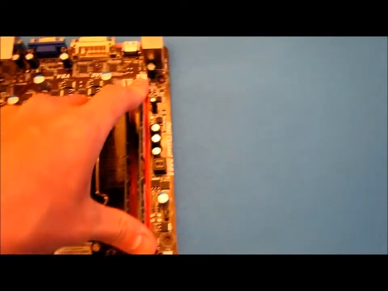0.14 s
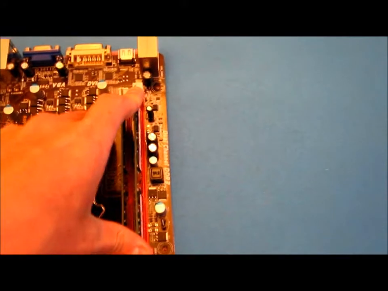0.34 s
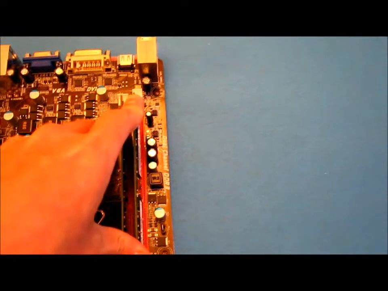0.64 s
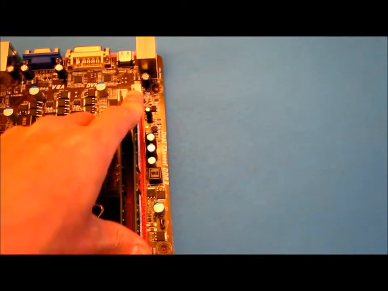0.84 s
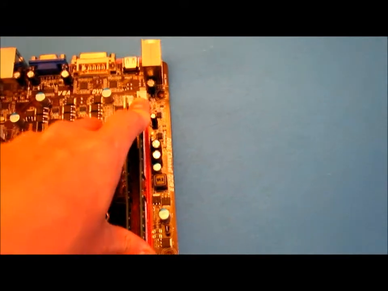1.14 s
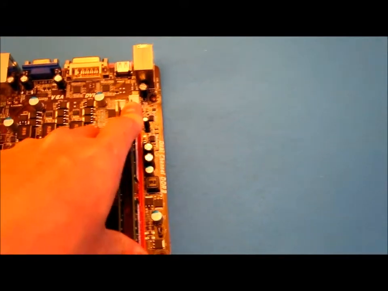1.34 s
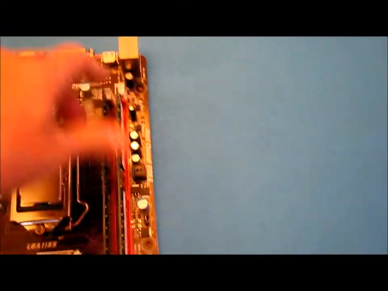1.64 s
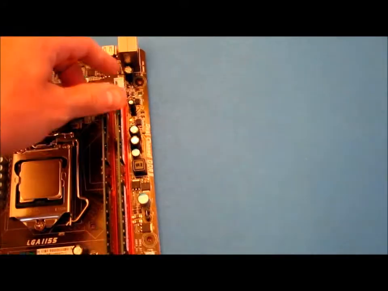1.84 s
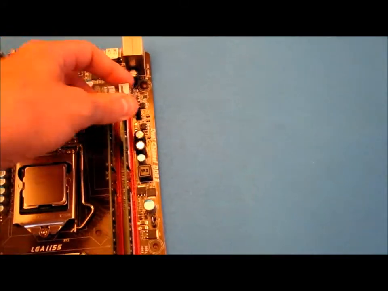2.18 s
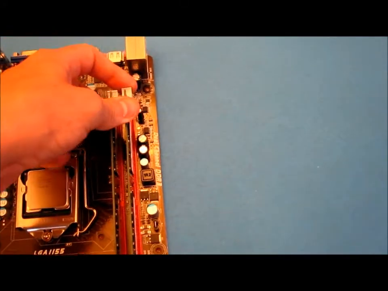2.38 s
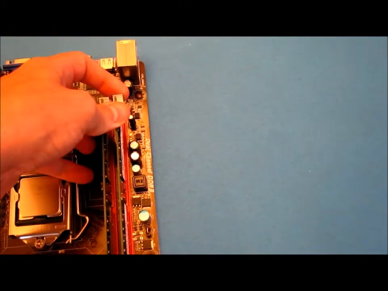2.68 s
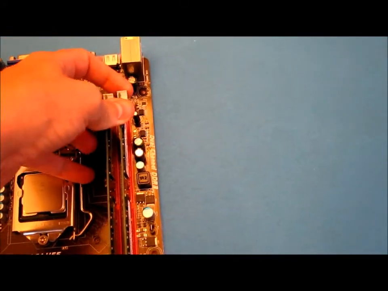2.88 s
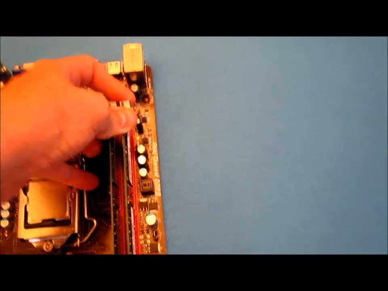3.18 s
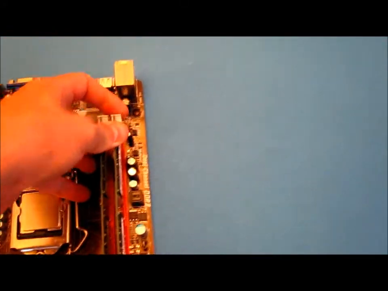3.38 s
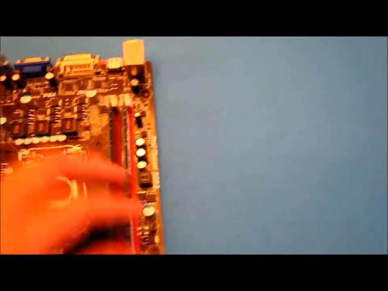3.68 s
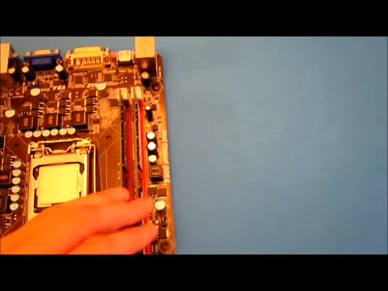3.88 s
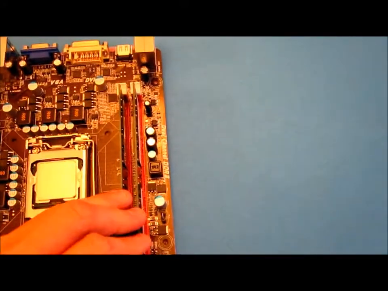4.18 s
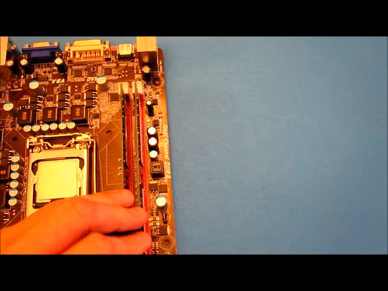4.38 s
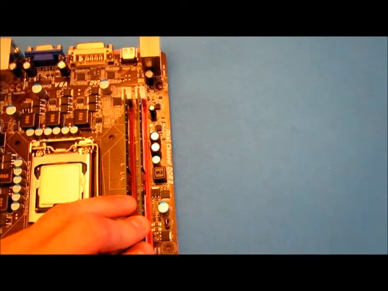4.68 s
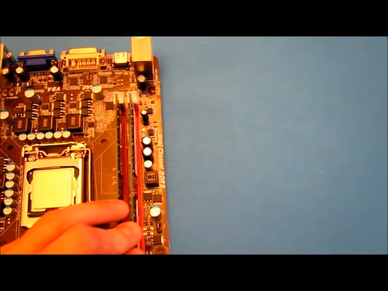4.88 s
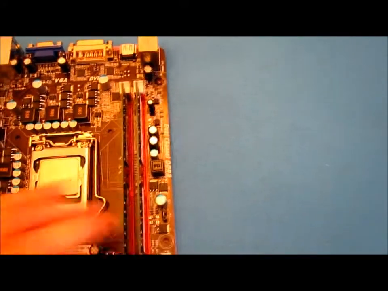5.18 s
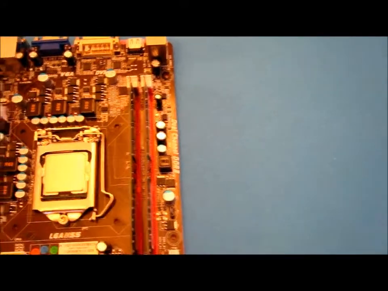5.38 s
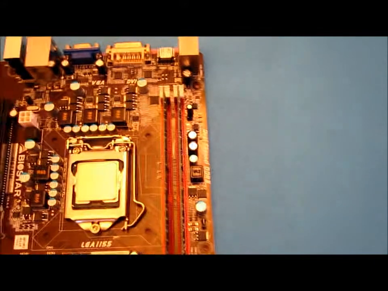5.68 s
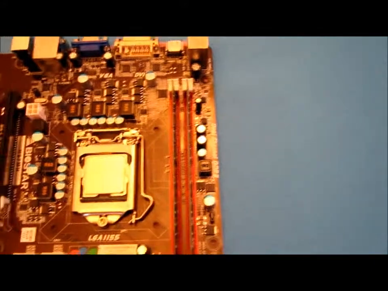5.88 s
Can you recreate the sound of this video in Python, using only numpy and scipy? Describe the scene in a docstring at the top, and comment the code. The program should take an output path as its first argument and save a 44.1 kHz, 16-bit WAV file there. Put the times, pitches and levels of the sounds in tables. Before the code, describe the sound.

Steady airy fan noise with faint whistles fills a small room. Over it, close and dry, stiff plastic latches snap, the board knocks and the desk thuds briefly. A cluster of clicks opens, sparse ticks follow, then one thin sharp crack, soft skin rubs, a late double click, and a low hissing slide at the end. Short wall reflections trail the hard snaps.

```python
"""A fan whirs steadily in a small room; close by, fingers press memory modules into a circuit board. Plastic
latches snap and tick: bursts of micro-impacts through broad resonances, with a module rattling. The board and
the desk under it ring as decaying sines, and the hollow below the desk swells after a blow. Skin and mat rub as
shaped noise, hard blows bring a short dull thump, and the walls answer briefly."""
import sys
import numpy as np
from scipy import signal
from scipy.fft import rfft, irfft, next_fast_len
from scipy.io import wavfile

SR = 44100
rng = np.random.default_rng(int(sys.argv[2]) if len(sys.argv) > 2 else 0)


def wav_out(sig):
    """Save sig, one row per channel (or a flat mono array), as 16-bit PCM at SR to the path in sys.argv[1]."""
    wavfile.write(sys.argv[1], SR, np.round(np.clip(np.atleast_2d(sig).T, -1, 1) * 32767).astype(np.int16))


N = 265967   # length in samples

# Levels in the tables are relative unless said otherwise.
# Plastic bodies of the latches. Each row: pitch in Hz, width in Hz, level in dB.
PLASTIC_MODES = [(2000, 830, 2), (2476, 820, 5), (2850, 670, 4.5), (3740, 550, 2.5), (4370, 1300, 0),
                 (5140, 560, 5.5), (5580, 950, 1.5)]
# Thin edges of the plastic. Each row: pitch in Hz, width in Hz, level in dB.
EDGE_MODES = [(7770, 2700, 3), (9550, 1800, 1.5), (12000, 1800, 0.5), (15200, 3000, -9)]
# The stiff board. Each row: pitch in Hz, level in dB, t60 in s.
BOARD_MODES = [(830, -35, 0.0057), (906, 1.5, 0.0076), (983, -15.5, 0.052), (1070, -3, 0.017),
               (1127, -14.5, 0.073), (1211, -7.5, 0.046), (1296, -20, 0.066), (1278, -1.5, 0.0087),
               (1420, -11, 0.036), (1600, 3.5, 0.0067), (1836, -13, 0.075)]
# The desk top. Each row: pitch in Hz, level in dB, t60 in s.
DESK_MODES = [(250.8, 4.5, 0.1), (276.6, 3.5, 0.27), (370, 7, 0.013), (399, 10.5, 0.013), (452, 3.5, 0.062),
              (523.6, 4, 0.06), (600.2, 10, 0.027), (655.5, 4.5, 0.035), (719, 8, 0.03), (856, 10, 0.022)]
# The hollow under the desk. Each row: pitch in Hz, level in dB, t60 in s.
HOLLOW_MODES = [(133.7, -21, 0.2), (180, -24, 0.097), (271.3, -17, 0.13)]
# Answer of the walls. Each row: frequency in Hz, level in dB, t60 in s.
WALL_ECHOES = [(100, -5, 0.82), (257, -16, 0.42), (676, -18, 0.21), (1800, -17.5, 0.34), (4850, -23, 0.39),
               (12800, -18, 0.24)]
# Air noise of the fan. Each row: frequency in Hz, level in dB per Hz.
FAN_SPECTRUM = [(13, -26), (22, -6.5), (270, -1.5), (387, -7), (432, -5.5), (771, -5.5), (1230, -2.5),
                (1410, -9.5), (1860, -5.5), (3230, -11), (5770, -17), (8260, -26.5), (8970, -43),
                (9740, -20), (16000, -25)]
# Whistles of the fan housing and motor. Each row: pitch in Hz, width in Hz of each of two
# filter passes, mean level in dB of full scale.
FAN_WHISTLES = [(964, 340, -60), (1188, 73, -62), (1580, 12, -67), (1860, 2.2, -63.5), (1854, 5.9, -64.5),
                (1896, 3.1, -65.5), (1940, 12, -65.5), (1900, 89, -61.5), (2115, 21, -65.5),
                (2170, 21, -60), (2333, 6.6, -63.5), (2457, 250, -61.5), (5800, 21, -69.5),
                (5630, 700, -67.5), (7330, 680, -64), (7880, 100, -68), (8800, 550, -61.5)]
# Skin on the parts. Each row: frequency in Hz, level in dB per Hz.
SKIN_SPECTRUM = [(300, -25), (1200, -14), (3000, 2), (4900, 0), (5800, 1), (6800, 0.5), (10000, -6),
                 (15000, -11)]
# Board on the mat. Each row: frequency in Hz, level in dB per Hz.
MAT_SPECTRUM = [(60, -8), (135, -7), (300, -4), (800, -5), (1800, -1), (4000, -35)]
# Rattle of the thin card after a contact. Each row: pitch in Hz, width in Hz, level in dB, t60 in s.
MODULE_RATTLES = [(2294, 75, -5, 0.17), (2930, 230, -1, 0.056), (3490, 300, -8, 0.12),
                  (4136, 93, -10, 0.29), (5400, 200, -11, 0.076), (6100, 120, -14, 0.24),
                  (7030, 530, -17, 0.27)]
# Rebounds of the board on the desk. Each row: delay after the blow in ms, level in dB.
REBOUNDS = [(11, -14), (19, -12.5), (28, -15), (38, -15.5)]
# Latches snap and modules seat hard. Each row: start in s, levels of plastic snap, thin edge tick,
# board, desk and hollow in dB, strongest pitches of snap, tick, board and desk in Hz, contact length in ms.
LATCH_SNAPS = [(0.3403, 3, -13.5, -2.5, -17, -41, 2720, 9300, 1250, 760, 2.5),
               (0.537, -9, -20.5, -15, -28.5, -25.5, 3560, 7500, 1390, 730, 4.9),
               (0.7798, -12.5, -25, -8.5, -32, -29.5, 3370, 7600, 1000, 560, 4),
               (0.821, -11.5, -26.5, -8, -28, -27.5, 2770, 8600, 1010, 650, 2.3),
               (1.1765, -16.5, -27.5, -20.5, -28.5, -41, 2900, 7100, 1260, 700, 4.1),
               (3.0787, 0.5, -7, -22.5, -36.5, -47, 6100, 12500, 1250, 334, 1.6),
               (4.8131, -3.5, -9.5, -9.5, -52, -30.5, 3600, 9100, 1110, 794, 3.5),
               (5.113, -19, -29, -29.5, -40, -41, 3120, 6630, 1010, 799, 2.9)]
# Light ticks of plastic on plastic, too weak to move the desk much. Each row: start in s, levels of
# plastic snap, thin edge tick and board in dB, strongest pitches of snap and board in Hz,
# contact length in ms (limited to 15 in the chatter).
LIGHT_TICKS = [(0.1066, -25, -30, -30, 5800, 850, 1.7), (0.163, -38, -38, -46, 5850, 942, 1.8),
               (0.5001, -17, -25.5, -29.5, 5300, 1300, 2.5), (0.7108, -30, -48, -27, 5100, 900, 2.7),
               (0.721, -36, -40, -47, 5900, 1100, 2.2), (0.7343, -33, -36, -52, 4920, 1120, 1.5),
               (0.7466, -37, -35, -41, 3800, 1200, 1.3), (0.797, -31, -31, -17.5, 3660, 1170, 1.7),
               (0.9644, -33.5, -44.5, -34, 2560, 1280, 3.7), (1.0845, -39, -36.5, -53, 2500, 921, 1.8),
               (1.1484, -33, -40, -27.5, 5810, 810, 3.0), (1.172, -27, -35, -34, 4400, 1480, 7.6),
               (1.5477, -39, -47, -51, 5880, 1890, 2.2), (1.5678, -19, -37, -42, 4530, 1130, 18),
               (1.5857, -16.5, -31, -35, 3100, 1020, 4.5), (2.144, -28, -53, -40.5, 2850, 1120, 2.8),
               (2.5206, -31, -38.5, -49, 2960, 958, 1.7), (2.5557, -31.5, -32, -55, 3540, 1850, 1.9),
               (2.7884, -47, -37, -42, 3760, 1210, 1.2), (2.8566, -24.5, -39, -29.5, 4060, 1850, 2.7),
               (3.359, -37, -48, -40, 3490, 1130, 2.5), (3.4132, -31, -39, -41, 2780, 1400, 3.0),
               (3.435, -43, -59, -37, 3060, 1200, 4.8), (4.0947, -31.5, -39, -41, 5450, 1240, 2.7),
               (4.214, -37, -44, -56, 5050, 1150, 3), (4.6704, -26.5, -34.5, -43, 2920, 1900, 5.7),
               (4.7445, -29, -32, -48, 6590, 802, 3.9), (4.7512, -30, -35, -39, 6340, 883, 1.9),
               (4.79, -29.5, -44, -29, 3990, 1110, 4.4), (5.013, -29.5, -31.5, -43, 3360, 1220, 1.4),
               (5.0841, -24.5, -32, -33, 5000, 1420, 3.3), (5.0915, -42, -39, -46, 6200, 1270, 1.5)]
# The board knocks dully on the desk under the hand. Each row: start in s, levels of plastic snap, board,
# desk and hollow in dB, strongest pitches of board, desk and hollow in Hz.
DULL_KNOCKS = [(0.3665, -32, -24.5, -31, -19, 1120, 517, 209),
               (0.458, -30.5, -31.5, -41, -36.5, 1340, 620, 200),
               (1.135, -44, -29, -30, -49, 869, 560, 190), (1.3999, -40, -48, -48, -51, 1180, 606, 190),
               (2.9155, -15.5, -20.5, -23.5, -27, 1330, 480, 138),
               (3.1803, -34, -34, -36.5, -42, 1200, 386, 262),
               (4.6787, -26.5, -29, -46, -36, 940, 799, 161), (4.7071, -52, -30.5, -32, -46, 816, 520, 190),
               (5.816, -43, -39, -50, -38, 1820, 509, 140), (5.862, -42, -53, -39, -57, 1790, 433, 190)]
# Strokes of the fingers over the parts. Each row: full from this second, held in s, level in dB of full scale.
FINGER_STROKES = [(1.39, 0.11, -49.5), (3.388, 0.027, -45), (3.75, 0.02, -50.5), (3.88, 0.01, -52),
                  (3.94, 0.03, -48), (4.555, 0.008, -55.5), (4.62, 0.0093, -58), (5.08, 0.011, -43.5),
                  (5.665, 0.014, -53), (5.825, 0.01, -58)]

FAN_AIR_DB = -48   # of full scale
WALL_GAP_MS = 1.5   # the echoes fade in around this moment
TICK_DESK_DB, TICK_HOLLOW_DB, TICK_DESK_HZ = -15.5, -22, 646   # levels relative to the board
TICK_EDGE_HZ, SHARP_MS = 8000, 2.07   # contacts shorter than this tick higher in proportion
KNOCK_EDGE_DB, KNOCK_SNAP_HZ, KNOCK_EDGE_HZ, KNOCK_MS = -9.5, 2950, 8800, 3.0   # edge relative to the snap
HOLLOW_HZ = 185   # strongest pitch of the hollow under every snap and tick
STROKE_RISE_DB_PER_S, STROKE_FALL_DB_PER_S = 259, 554
SLIDE_FROM_S, SLIDE_DB, SLIDE_RISE_DB_PER_S = 5.86, -50.5, 55   # full from this second on
SOFTNESS = 0.97   # filter width of a soft push, as a share of the mode's pitch
CUTOFF_HZ = 15900


def from_db(db):
    """Gain of a level in dB."""
    return 10 ** (np.asarray(db) / 20)


def rms_one(x):
    """Scaled to rms 1."""
    return x / np.sqrt(np.mean(x ** 2) + 1e-20)


def at_hz(points, hz, axis=1):
    """One column of a spectrum table, read on a log-frequency axis."""
    points = np.array(points)
    return np.interp(np.log(np.maximum(hz, 1)), np.log(points[:, 0]), points[:, axis])


def coloured(spectrum):
    """Noise of a given spectrum; rms 1 or very near."""
    size = next_fast_len(N)
    hz = np.arange(size // 2 + 1) * SR / size
    shaped = rfft(rng.standard_normal(size)) * from_db(at_hz(spectrum, hz))
    return rms_one(irfft(shaped, size)[:N]) if size == N else rms_one(irfft(shaped, size)[:N])


def drift(points_per_s):
    """Random wandering of rms 1: straight lines between random points."""
    points = rng.standard_normal(int(N * points_per_s // SR + 2))
    return rms_one(np.interp(np.arange(N) * points_per_s / SR, np.arange(len(points)), points))


def resonance(x, hz, width_hz):
    """Two-pole band-pass with gain 1 on top."""
    r = np.exp(-np.pi * width_hz / SR)
    top = np.array([1, 0, -1]) * (1 - r * r) / 2
    return signal.lfilter(top, [1, -2 * r * np.cos(2 * np.pi * hz / SR), r * r], x + 1e-18)


def ring(x, hz, t60):
    """A unit click sets a sine ringing from height 1."""
    r, w = from_db(-60 / (t60 * SR)), 2 * np.pi * hz / SR
    return signal.lfilter([0, np.sin(w)], [1, -2 * r * np.cos(w), r * r], x + 1e-18)


def contacts():
    """Snaps, ticks and knocks in common columns, with the shared traits filled in."""
    rows = [(*row, HOLLOW_HZ) for row in LATCH_SNAPS]
    for s, snap_db, tick_db, board_db, snap_hz, board_hz, ms in LIGHT_TICKS:
        tick_hz = TICK_EDGE_HZ * max(1, SHARP_MS / ms)
        rows.append((s, snap_db, tick_db, board_db, board_db + TICK_DESK_DB, board_db + TICK_HOLLOW_DB,
                     snap_hz, tick_hz, board_hz, TICK_DESK_HZ, ms, HOLLOW_HZ))
    for s, snap_db, board_db, desk_db, hollow_db, board_hz, desk_hz, hollow_hz in DULL_KNOCKS:
        rows.append((s, snap_db, snap_db + KNOCK_EDGE_DB, board_db, desk_db, hollow_db,
                     KNOCK_SNAP_HZ, KNOCK_EDGE_HZ, board_hz, desk_hz, KNOCK_MS, hollow_hz))
    names = ("start_s", "snap_db", "tick_db", "board_db", "desk_db", "hollow_db",
             "snap_hz", "tick_hz", "board_hz", "desk_hz", "length_ms", "hollow_hz")
    return dict(zip(names, np.transpose(rows)))


def blows(levels_db, spread_db):
    """One click per contact, its strength scattered by spread_db."""
    out = np.zeros(N)
    at = np.round(contacts()["start_s"] * SR).astype(int)
    out[at] = from_db(levels_db + spread_db * rng.standard_normal(len(at)))
    return out


def favour(hz, strongest_hz, db_per_octave_squared):
    """Where a part is struck decides which modes speak: level falls away from the strongest."""
    return -db_per_octave_squared * np.log2(hz / strongest_hz) ** 2


def fan():
    """Steady air noise plus narrow and broad whistles, all wavering slowly in level."""
    out = from_db(FAN_AIR_DB + 0.5 * drift(2.89)) * coloured(FAN_SPECTRUM)
    white = rng.standard_normal(N)
    for hz, width_hz, db in FAN_WHISTLES:
        whistle = rms_one(resonance(resonance(white, hz, width_hz), hz, width_hz))
        out += from_db(db + 0.93 * drift(3.93)) * whistle
    return out


def room(x):
    """Diffuse wall echoes after a first gap, dying at a rate of their own in each half octave."""
    t = np.arange(SR // 2) / SR
    edges = 60 * 2 ** np.arange(0, 8.6, 0.5)
    tail = np.zeros(len(t))
    for low, high in zip(edges, edges[1:]):
        hz = np.sqrt(low * high)
        band_pass = signal.butter(2, [low, min(high, 0.45 * SR)], "band", fs=SR, output="sos")
        band = signal.sosfilt(band_pass, rng.standard_normal(len(t)))
        decay_db = -60 * t / at_hz(WALL_ECHOES, hz, axis=2)
        tail += band * from_db(at_hz(WALL_ECHOES, hz) - 20 + decay_db)
    fade_in = np.clip(t * 1000 / WALL_GAP_MS - 0.5, 0, 1)
    return signal.fftconvolve(x, tail * fade_in)[:N]


def thud():
    """A hard blow on the board brings a short dull low pulse."""
    dull = signal.butter(2, 450.0, fs=SR, output="sos")
    return signal.sosfilt(dull, blows(contacts()["board_db"] + 11.0, 0))


def boom():
    """The hollow is driven through the desk top, so it swells before it dies."""
    c = contacts()
    out = np.zeros(N)
    for hz, db, t60 in HOLLOW_MODES:
        levels_db = c["hollow_db"] + db + 21.0 + favour(hz, c["hollow_hz"], 11.6)
        out += resonance(ring(blows(levels_db, 1.0), hz, t60), hz, 13.8)
    return out


def stroke(full_s, held_s, db, rise_db_per_s):
    """Gain of a stroke: it builds up, holds and lets go."""
    t = np.arange(N) / SR - full_s
    rise_db = rise_db_per_s * np.minimum(t, 0)
    fall_db = STROKE_FALL_DB_PER_S * np.maximum(t - held_s, 0)
    return from_db(db + rise_db - fall_db)


def sliding():
    """The board slides off along the desk, hissing low on the mat until the end."""
    return stroke(SLIDE_FROM_S, 1, SLIDE_DB, SLIDE_RISE_DB_PER_S) * coloured(MAT_SPECTRUM)


def rubbing():
    """Skin catches and slips on the parts in dense small grains."""
    grains = from_db(2.2 * drift(400))
    gain = sum(stroke(*row, STROKE_RISE_DB_PER_S) for row in FINGER_STROKES)
    return gain * rms_one(grains * coloured(SKIN_SPECTRUM))


def struck(modes, levels_db, strongest_hz, db_per_octave_squared):
    """Every contact pushes every mode softly, each a little differently, so it swells for a cycle or two."""
    out = np.zeros(N)
    for hz, db, t60 in modes:
        push = blows(levels_db + db + favour(hz, strongest_hz, db_per_octave_squared), 1.5)
        soft = resonance(resonance(push, hz, SOFTNESS * hz), hz, SOFTNESS * hz)
        out += ring(soft, hz, t60)
    return out


def board_and_desk():
    """The stiff board knocks near one kilohertz, the desk top below; the desk sounds again at each rebound."""
    c = contacts()
    desk = struck(DESK_MODES, c["desk_db"] - 1.0, c["desk_hz"], 10.3)
    rebounds = sum(from_db(db) * np.roll(desk, round(ms * SR / 1000)) for ms, db in REBOUNDS)
    board = struck(BOARD_MODES, c["board_db"] + 4.5, c["board_hz"], 33.0)
    return board + desk + rebounds


def module_rattle():
    """The loose card knocks about in its slot: uneven noise, dying away, through its resonances."""
    c = contacts()
    out = np.zeros(N)
    for hz, width_hz, db, t60 in MODULE_RATTLES:
        clicks = blows(db + c["snap_db"] + favour(hz, c["snap_hz"], 14.6), 0)
        shaking = signal.lfilter([1], [1, -from_db(-60 / (t60 * SR))], clicks + 1e-18)
        rattle = from_db(0.9 * drift(220)) * rng.standard_normal(N)
        out += resonance(shaking * rattle, hz, width_hz)
    return out


def chatter():
    """Each contact is a short burst of uneven micro-impacts of unit energy, one row each."""
    t = np.arange(2000) / SR
    tau = np.clip(contacts()["length_ms"], 0.3, 15)[:, None] / 1000
    draws = rng.standard_normal((len(tau), 2, len(t)))
    impacts = draws[:, 0] * from_db(8.2 * draws[:, 1])
    bursts = impacts * (t / tau) ** 0.82 * np.exp(-2.1 * t / tau)
    return bursts / np.linalg.norm(bursts, axis=1, keepdims=True)


def latches():
    """Plastic resonances driven twice: by close chatter, and by the single crack the walls return."""
    c = contacts()
    starts = (c["start_s"] * SR).astype(int)
    close, crack, bursts = np.zeros(N), np.zeros(N), chatter()
    parts = [(hz, width_hz, db + c["snap_db"] + 22.5 + favour(hz, c["snap_hz"], 4.4))
             for hz, width_hz, db in PLASTIC_MODES]
    parts += [(hz, width_hz, db + c["tick_db"] + 25.0 + favour(hz, c["tick_hz"], 10.8))
              for hz, width_hz, db in EDGE_MODES]
    for k, (hz, width_hz, levels_db) in enumerate(parts):
        sign = (-1) ** k   # neighbouring modes in opposite phase
        crack += sign * resonance(blows(levels_db, 0), hz, width_hz)
        rung_bursts = resonance(from_db(levels_db)[:, None] * bursts, hz, width_hz)
        for at, rung in zip(starts, rung_bursts):
            close[at:at + len(rung)] += sign * rung
    return close, crack


def scene():
    """Contacts and rubbing in the room, over the fan."""
    small = signal.butter(2, 1300.0, "high", fs=SR, output="sos")   # small plastic parts radiate no bass
    close, crack = latches()
    close = signal.sosfilt(small, close + module_rattle())
    crack = signal.sosfilt(small, crack)
    bodies = board_and_desk()
    friction = rubbing() + sliding()
    walls = room(crack + bodies + friction)
    return (close + bodies + friction + walls + boom() + thud() + fan())[None]


def record(dry):
    """Peaks beyond full scale clip, then the top is cut steeply."""
    low_pass = signal.ellip(10, 0.5, 70, CUTOFF_HZ, fs=SR, output="sos")
    return signal.sosfilt(low_pass, np.clip(dry, -1, 1))


dry = scene()
out = record(dry)
wav_out(out)
```